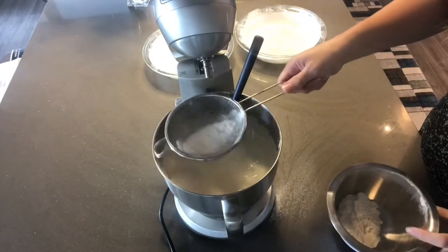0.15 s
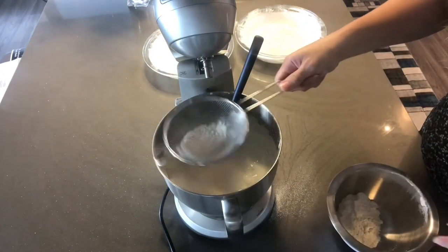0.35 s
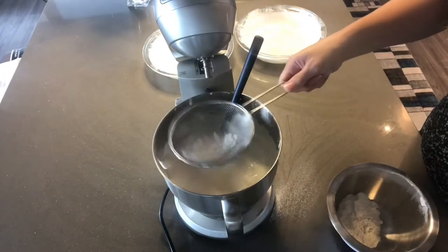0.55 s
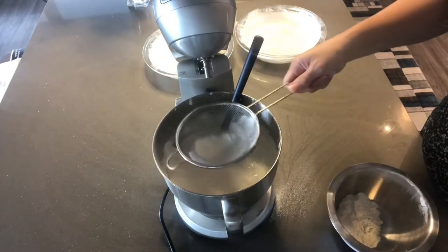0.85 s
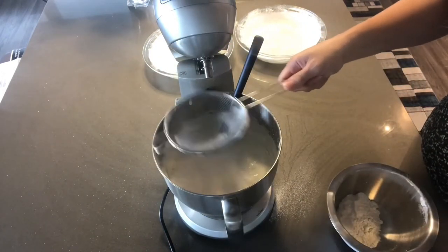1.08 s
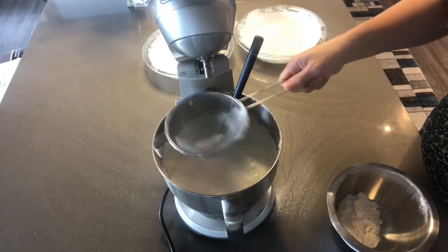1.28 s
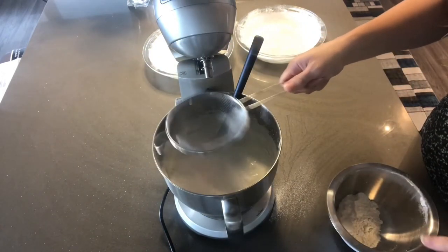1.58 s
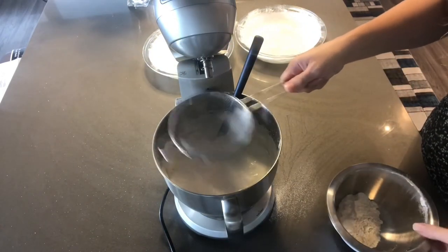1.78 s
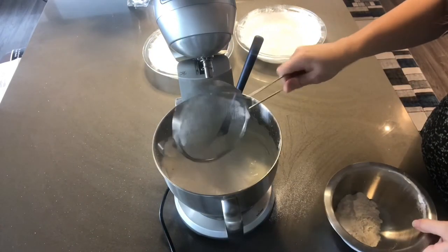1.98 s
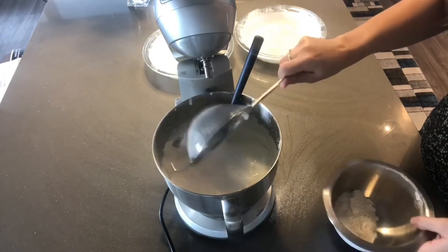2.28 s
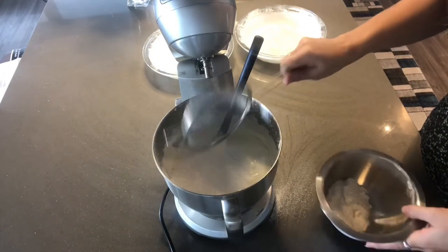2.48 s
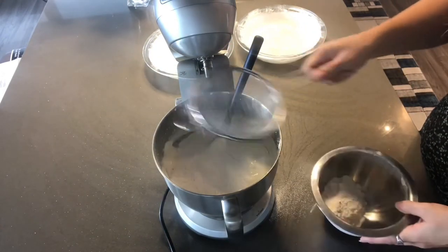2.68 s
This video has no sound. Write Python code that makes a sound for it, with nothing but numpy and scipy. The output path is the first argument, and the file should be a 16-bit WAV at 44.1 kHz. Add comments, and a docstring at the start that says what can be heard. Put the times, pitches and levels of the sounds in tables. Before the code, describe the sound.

A metal sieve clinks, knocks hard and rattles against a steel mixing bowl.

```python
"""In a kitchen, flour is sifted over the steel bowl of a stand mixer while the ventilation hums.
The flour hisses through the mesh, which brushes the rim. The sieve's hoop clinks once, then the sieve
is knocked hard on the bowl and rattles against it as it is lifted. Each hit on steel is a snap, a short
crack and ringing tones, echoed by the hard walls. The knock sets the mixer rumbling on the counter."""
import sys
import numpy as np
from scipy import signal
from scipy.fft import rfft, irfft
from scipy.io import wavfile

SR = 44100
rng = np.random.default_rng(int(sys.argv[2]) if len(sys.argv) > 2 else 0)


def file_out(sig):
    """Save sig as 16-bit WAV at sys.argv[1]."""
    # one column per channel
    cols = np.atleast_2d(sig).T
    # limit, then scale
    lim = np.clip(cols, -1, 1)
    pcm = np.round(lim * 32767).astype(np.int16)
    wavfile.write(sys.argv[1], SR, pcm)


N = 125685

# A "colour" says how strong each frequency is; "t60" is the time a sound takes to fade by 60 dB.
# colour of the moving air (f/Hz, level/dB)
AIR_COLOUR = [(15, -46.5), (25, -23.5), (53, -2.5), (92, -6.5), (120, -2), (153, -5.5), (263, -3.5),
              (354, -4), (384, -6.5), (451, -5.5), (489, -10.5), (796, -17.5), (863, -17.5), (988, -20.5),
              (2160, -29), (7110, -33.5), (16000, -42.5)]
# hum of the fan (f/Hz, level/dB)
FAN_TONES = [(126, -68), (269, -68), (413, -68.5), (456, -70), (840, -74)]
# colour of the slow wobble in the fan's pitch (f/Hz, level/dB)
WOBBLE_COLOUR = [(1, 0), (8, 0), (30, -60), (100, -120)]
# how long the kitchen echoes (f/Hz, t60/s)
ECHO_FADES = [(150, 0.2), (700, 0.4353), (2000, 0.49), (4500, .5), (8000, 0.36), (15000, 0.2546)]
# colour of that echo (f/Hz, level/dB)
ECHO_COLOUR = [(100, -0.5), (700, 5), (1500, 4), (3000, -1.5), (7000, -5), (10000, -4), (16000, 0)]
# sound bouncing off the counter and mixer head (delay/s, level/dB)
NEAR_ECHOES = [(.0015, -17.5), (.0040, -21), (.0088, -14.5)]
# loudness of the flour passing through the mesh (t/s, level/dB)
FLOUR_LEVELS = [(0, -71.5), (.45, -73), (.9, -78.5), (1.6, -77.5), (2.85, -77.5)]
# colour of the flour's hiss (f/Hz, level/dB)
FLOUR_COLOUR = [(500, -20.5), (2500, -5.5), (4500, -2.5), (7300, 1.5), (8800, -12.5), (16000, -14)]
# the mesh brushing the rim (t/s, peak level/dB, rise time/s)
MESH_BRUSHES = [(1.16, -63.5, 0.01), (1.426, -59.5, 0.01), (1.923, -61.5, 0.0065)]
# colour of the brushing (f/Hz, level/dB)
MESH_COLOUR = [(300, 0), (1000, 3), (2500, 0), (6500, 0), (9000, -16), (16000, -17)]
# colour of the mixer's rumble (f/Hz, level/dB)
MIXER_COLOUR = [(20, -39.5), (45, -19.5), (75, -2.5), (105, 2), (165, 0.5), (230, -5), (350, -8),
                (600, -18), (2000, -52)]
# the mixer rocking back on its feet (t/s, level/dB)
MIXER_THUDS = [(2.64, -29), (2.725, -41)]

# ringing of the rim when the sieve only chatters on it (f/Hz, level/dB, t60/s)
RIM_TONES = [(734.3, -38, 0.096), (1500, -36, 0.014), (1986, -38, 0.013), (3740, -52, 0.012)]
# colour of the rim's snap and crack (f/Hz, level/dB)
RIM_COLOUR = [(60, -25), (190, 1.5), (1000, -3), (2000, -5.5), (2600, -8), (4000, -10.5), (6500, -12),
              (9000, -26), (16000, -30)]
# chatter after the clink and the knock (t/s, level/dB, treble cutoff/Hz, room echo/dB)
RIM_RATTLES = [(1.852, -14, 9000, -8), (1.9155, -20, 5000, -13), (1.9215, -11.5, 12000, -18),
               (1.9272, -13, 12000, -8.5), (2.6175, 2.5, 3800, -9.5), (2.6250, 1.5, 3800, -11),
               (2.815, -24, 12000, -8)]
# ringing of the sieve's hoop and wire handle (f/Hz, level/dB, t60/s)
HOOP_TONES = [(734, -52.5, 0.38), (950, -31, 0.023), (1140, -38.5, 0.078), (1494, -38.5, 0.065),
              (1837, -36, 0.025), (3930, -35, 0.066), (3975, -46.5, 0.26), (4300, -35, 0.034),
              (4910, -40.5, 0.063), (5420, -49, 0.18), (8470, -35.5, 0.057), (9300, -41.5, 0.13),
              (9980, -36.5, 0.016), (15300, -39, 0.031)]
# colour of the hoop's snap and crack (f/Hz, level/dB)
HOOP_COLOUR = [(60, -44), (250, -3), (900, 5), (1800, -3), (2500, -15), (3200, -3), (4500, 4.5), (7200, -9),
               (9500, 0), (10600, 2.5), (11500, -26), (13500, -14), (15500, -25)]
# the tap of the hoop (t/s, level/dB, treble cutoff/Hz, room echo/dB)
HOOP_CLINKS = [(1.7330, -0.5, 16000, -3)]
# ringing of bowl and sieve struck together (f/Hz, level/dB, t60/s)
BOWL_TONES = [(490, -33, .05), (725, -23.5, .05), (754, -39, .25), (1380, -15, .032), (1520, -27, .04),
              (2280, -25, .028), (2630, -20, .018), (2785, -17, .032), (3470, -16, .022), (4180, -11, .018),
              (4400, -12, .012), (4610, -13, .022), (5050, -12, .013), (5820, -14, .02), (7060, -10, .016),
              (7650, -16, .02)]
# colour of the bowl's snap and crack (f/Hz, level/dB)
BOWL_COLOUR = [(40, -37), (130, -8.5), (400, -7), (720, -2), (1000, -11), (1400, 2.5), (2200, -8),
               (2700, -0.5), (3050, -5.5), (3500, 3), (4400, -0.5), (7500, 4.5), (8600, -4.5), (10000, -3),
               (11500, -11.5), (16000, -14.5)]
# the sieve hitting the bowl (t/s, level/dB, treble cutoff/Hz, room echo/dB)
BOWL_KNOCKS = [(2.4072, -50, 9050, -6.5), (2.4288, -1, 16000, -6.5)]

BEND_LAG_S = 0.003023  # how late a 1 kHz bending wave in the steel arrives


def undb(db):
    """Turn decibels into a factor to multiply by."""
    return 10 ** (np.asarray(db) / 20)


def at_hz(points, hz):
    """Read between a table's rows, with octaves evenly spaced."""
    freqs, values = np.array(points, float).T
    return np.interp(np.log(np.maximum(hz, 1)), np.log(freqs), values)


def noise(colour):
    """Steady noise of the given colour, with an average size (rms) of 1."""
    gains = undb(at_hz(colour, np.fft.rfftfreq(N, 1 / SR)))
    shaped = irfft(rfft(rng.standard_normal(N)) * gains, N)
    return shaped / np.sqrt(np.mean(shaped ** 2))


def fade(t, t60):
    """Silence before zero, then a fall of 60 dB every t60 seconds."""
    return (t >= 0) * np.exp(-np.log(1000) * np.maximum(t, 0) / t60)


def delay(x, seconds):
    """Start a sound later."""
    return np.concatenate([np.zeros(int(max(seconds, 0) * SR)), x])[:N]


def ringing_tone(age, hz, t60):
    """A fading tone that builds up over its first cycle."""
    return np.sin(2 * np.pi * hz * age) * fade(age, t60) * np.clip(age * hz, 0, 1)


def ventilation(t, air_db=-54.5, wobble_hz=4):
    """Moving air makes a low rush, and the fan adds a few wavering tones."""
    out = undb(air_db) * noise(AIR_COLOUR)
    for hz, db in FAN_TONES:
        pitch = hz + wobble_hz * noise(WOBBLE_COLOUR)
        out += undb(db) * np.sqrt(2) * np.sin(2 * np.pi * np.cumsum(pitch) / SR)
    return out


def kitchen_echo(t, build_s=0.015):
    """The hard walls' answer to one click: deep bass and high treble die first."""
    hz = np.fft.rfftfreq(N, 1 / SR)
    spectrum = rfft(noise(ECHO_COLOUR))
    echo = np.zeros(N)
    for centre, t60 in ECHO_FADES:
        band = at_hz([(f, f == centre) for f, _ in ECHO_FADES], hz)  # 1 here, 0 at the other rows
        echo += irfft(spectrum * band, N) * fade(t, t60)
    echo *= np.minimum(t / build_s, 1)
    return echo / np.sqrt(np.sum(echo ** 2))


def sifting_flour(t, shake_hz=7, shake_db=0.5):
    """Flour whispers through the mesh, a little louder at each shake."""
    times, levels = np.array(FLOUR_LEVELS).T
    shakes = shake_db * np.sin(2 * np.pi * shake_hz * t)
    return undb(np.interp(t, times, levels) + shakes) * noise(FLOUR_COLOUR)


def brushing_mesh(t, room, room_db=-5.5):
    """The mesh grazes the rim in short swells of noise, and the room echoes them."""
    swell = np.zeros(N)
    for start, db, rise_s in MESH_BRUSHES:
        progress = np.maximum(t - start, 0) / rise_s
        swell += undb(db) * progress * np.exp(1 - progress)
    brush = swell * noise(MESH_COLOUR)
    return brush + undb(room_db) * signal.fftconvolve(brush, room)[:N]


def mixer_rumble(t, rumble_db=-43.5, rise_s=0.015):
    """The hardest knock sets the mixer shaking on the counter; it thuds as it settles."""
    age = t - max(BOWL_KNOCKS, key=lambda row: row[1])[0]
    swell = fade(age, t60=1.7) * np.clip(age / rise_s, 0, 1)
    rumble = undb(rumble_db) * noise(MIXER_COLOUR) * swell
    thuds = sum(undb(db) * ringing_tone(t - start, hz=155, t60=0.037) for start, db in MIXER_THUDS)
    return rumble + thuds


def bend_lag(hz):
    """Seconds a bending wave arrives late: low ones travel slowest (all alike below 500 Hz)."""
    return BEND_LAG_S * np.minimum(1000 / np.maximum(hz, 1), 2)


def steel_snap(colour):
    """A click of the given colour, smeared because its low notes cross the steel more slowly."""
    hz = np.fft.rfftfreq(N, 1 / SR)
    # folding the cepstrum (a transform of the log spectrum) packs the click's energy at its start
    cepstrum = irfft(np.log(undb(at_hz(colour, hz))), N)
    cepstrum[1:N // 2] *= 2
    cepstrum[N // 2:] = 0
    phase_lag = 2 * np.pi * np.cumsum(bend_lag(hz)) * SR / N
    click = irfft(np.exp(rfft(cepstrum) - 1j * phase_lag), N)
    return click / np.sqrt(np.sum(click ** 2))


def steel_hit(t, tones, colour, snap_db, crack_db, crack_t60, room_snap_db, room_ring_db):
    """Struck steel snaps, cracks and rings. Gives the direct sound and the sound sent into the room."""
    ring = np.zeros(N)
    for hz, db, t60 in tones:
        age = t - bend_lag(hz) * rng.uniform(0.8, 1.22)
        ring += undb(db) * ringing_tone(age, hz, t60)
    snap = steel_snap(colour)
    burst = rng.standard_normal(N) * fade(t, crack_t60)  # a crowd of short-lived tones
    crack = signal.fftconvolve(snap, burst)[:N]
    direct = ring + undb(snap_db) * snap + undb(crack_db) * crack
    into_room = undb(room_ring_db) * ring + undb(room_snap_db) * snap
    return direct, into_room


def play_hits(table, hit, room):
    """Play a hit at each listed time, with its echoes and its own loudness and brightness."""
    direct, into_room = hit
    near = direct + sum(undb(db) * delay(direct, lag) for lag, db in NEAR_ECHOES)
    far = signal.fftconvolve(into_room, room)[:N]
    out = np.zeros(N)
    for start, db, cutoff_hz, room_db in table:
        treble_cut = signal.butter(2, cutoff_hz, fs=SR, output="sos")
        dulled = signal.sosfilt(treble_cut, near + undb(room_db) * far)
        out += undb(db) * delay(dulled, start)
    return out


def rim_rattle(t, room):
    """The sieve chatters on the rim in light, quick taps."""
    hit = steel_hit(t, RIM_TONES, RIM_COLOUR, snap_db=-21, crack_db=-42.5, crack_t60=0.022,
                    room_snap_db=-20, room_ring_db=-3)
    return play_hits(RIM_RATTLES, hit, room)


def hoop_clink(t, room):
    """One tap sets the sieve's hoop and wire handle ringing brightly."""
    hit = steel_hit(t, HOOP_TONES, HOOP_COLOUR, snap_db=-21, crack_db=-29.5, crack_t60=0.03,
                    room_snap_db=-11.5, room_ring_db=-5)
    return play_hits(HOOP_CLINKS, hit, room)


def bowl_knock(t, room):
    """The sieve touches the bowl, then hits it hard: a loud snap and a short ring."""
    hit = steel_hit(t, BOWL_TONES, BOWL_COLOUR, snap_db=7, crack_db=-8.5, crack_t60=0.015,
                    room_snap_db=10.5, room_ring_db=-11)
    return play_hits(BOWL_KNOCKS, hit, room)


def scene():
    """Add all the sounds together in one channel."""
    t = np.arange(N) / SR
    room = kitchen_echo(t)
    hits = bowl_knock(t, room) + hoop_clink(t, room) + rim_rattle(t, room)
    sifting = brushing_mesh(t, room) + sifting_flour(t)
    return (hits + sifting + mixer_rumble(t) + ventilation(t))[None]


def record(dry, bass_hz=36, top_hz=16200):
    """Clip the loudest peak, thin the deep bass and cut the highest treble."""
    bass_cut = signal.butter(3, bass_hz, "high", fs=SR, output="sos")
    top_cut = signal.ellip(8, 0.2, 70, top_hz, fs=SR, output="sos")
    thinned = signal.sosfilt(bass_cut, np.clip(dry, -1, 1))
    return signal.sosfilt(top_cut, thinned)


dry = scene()
out = record(dry)
file_out(out)
```